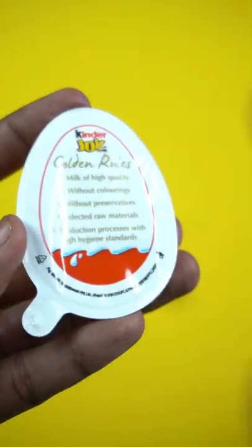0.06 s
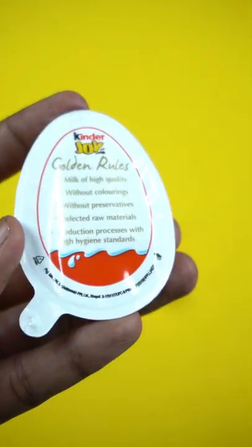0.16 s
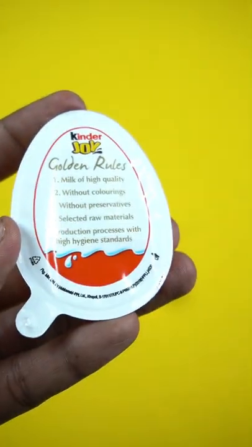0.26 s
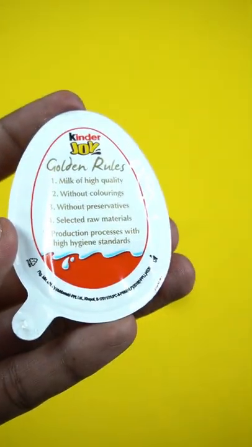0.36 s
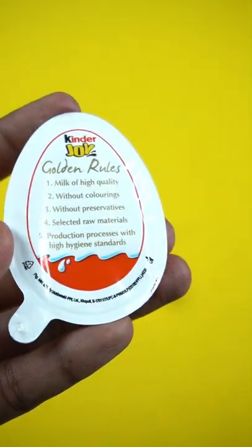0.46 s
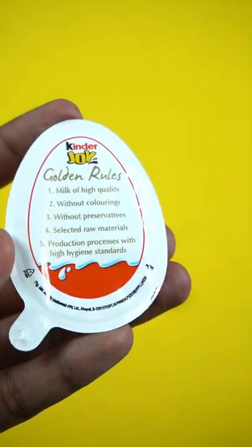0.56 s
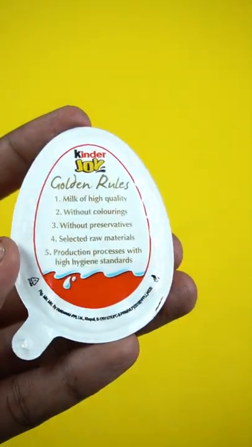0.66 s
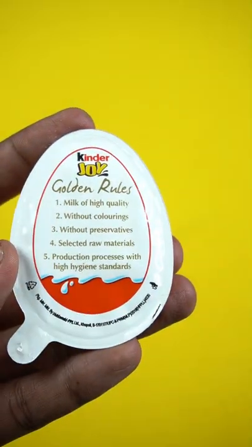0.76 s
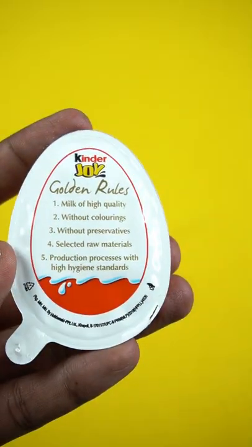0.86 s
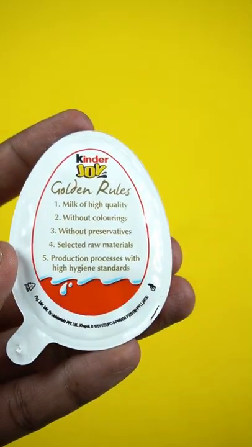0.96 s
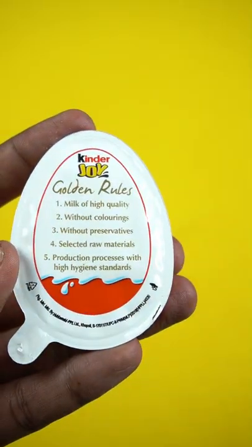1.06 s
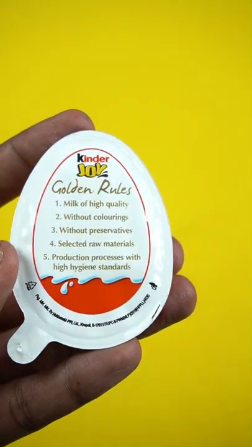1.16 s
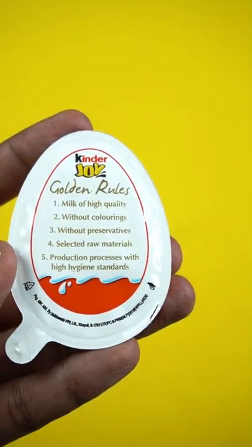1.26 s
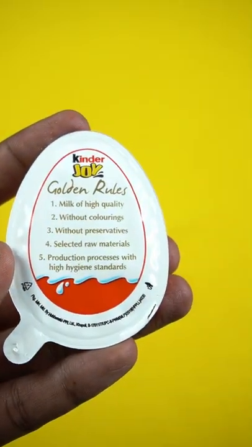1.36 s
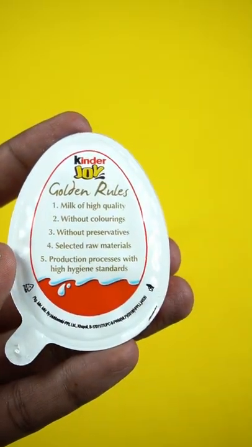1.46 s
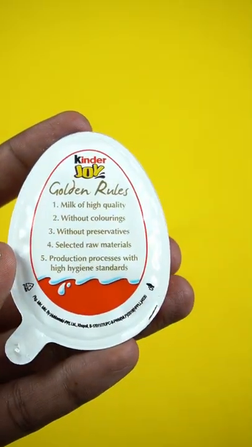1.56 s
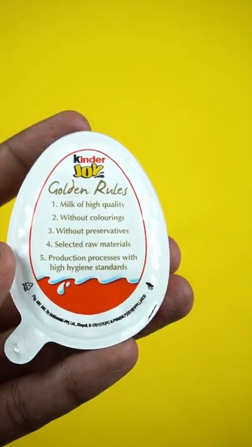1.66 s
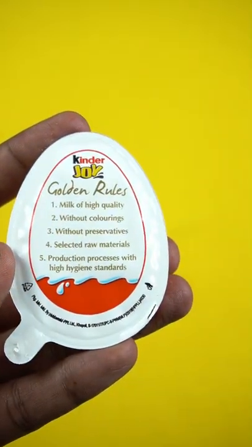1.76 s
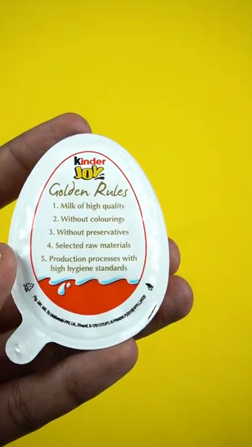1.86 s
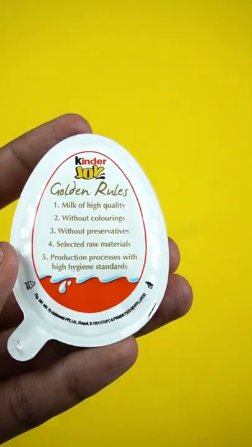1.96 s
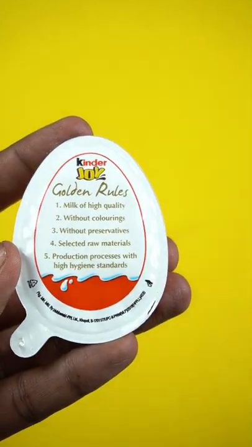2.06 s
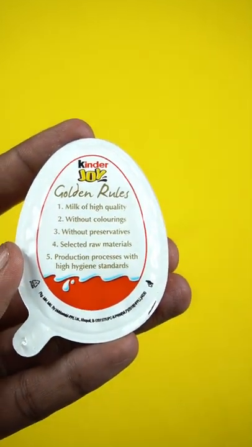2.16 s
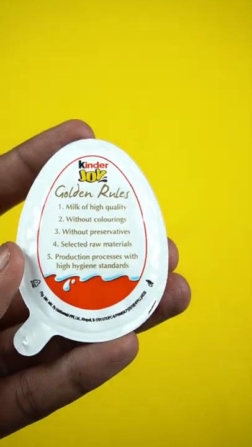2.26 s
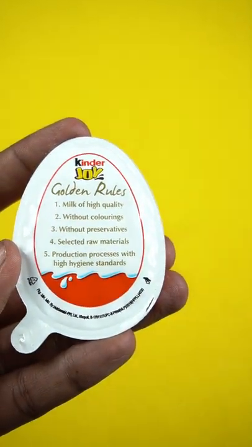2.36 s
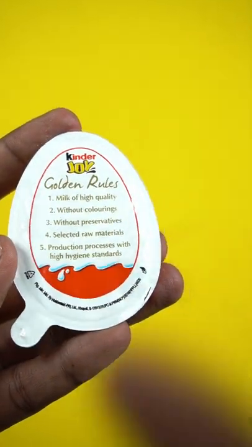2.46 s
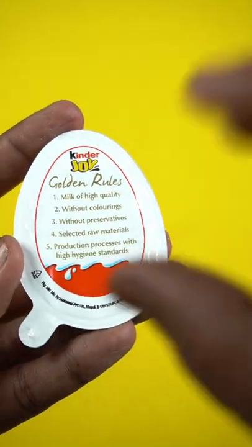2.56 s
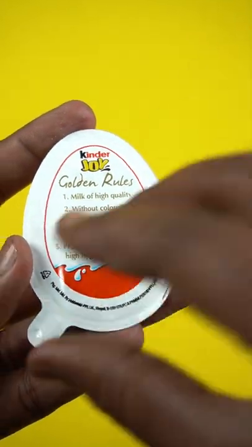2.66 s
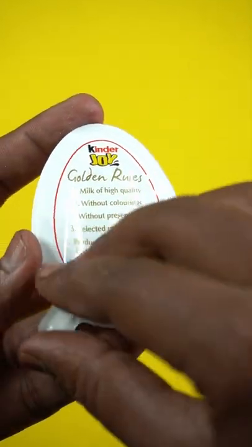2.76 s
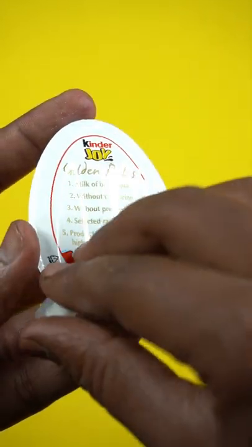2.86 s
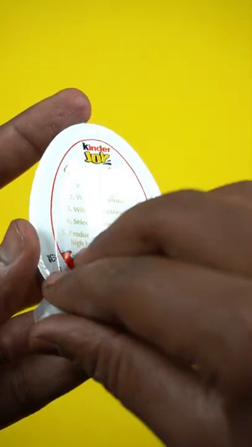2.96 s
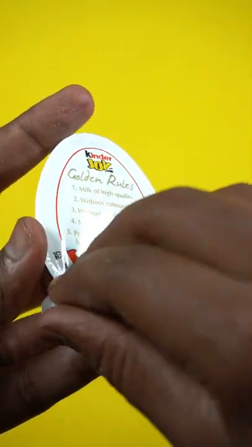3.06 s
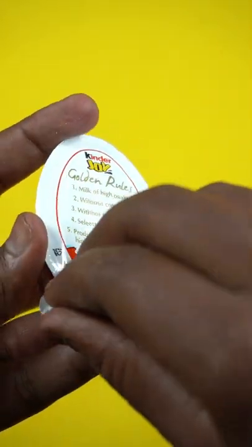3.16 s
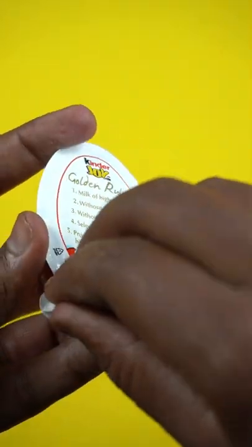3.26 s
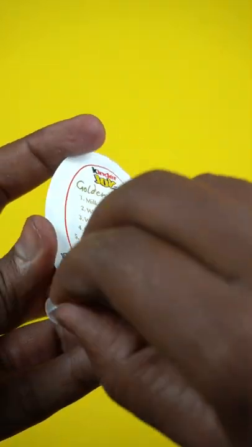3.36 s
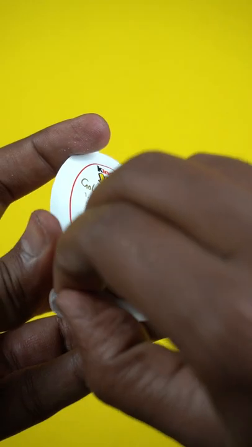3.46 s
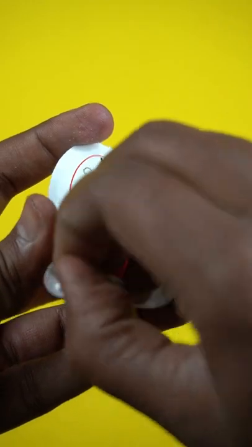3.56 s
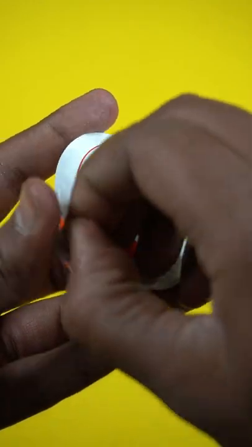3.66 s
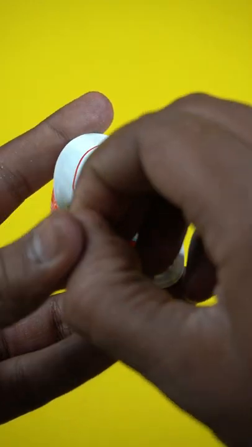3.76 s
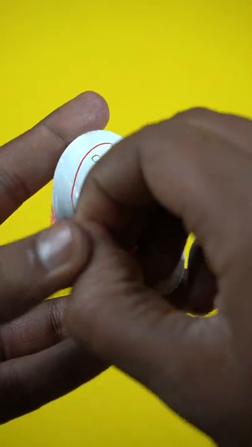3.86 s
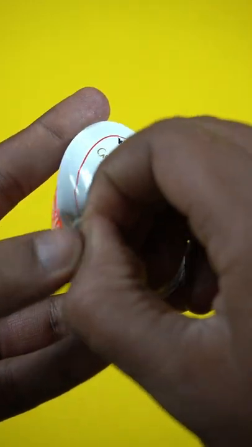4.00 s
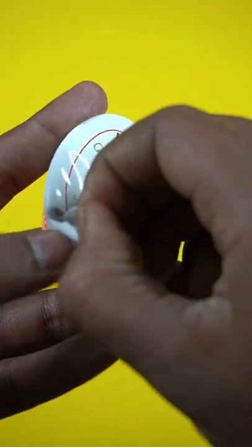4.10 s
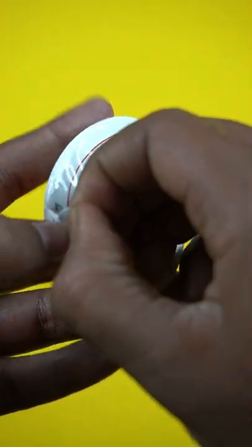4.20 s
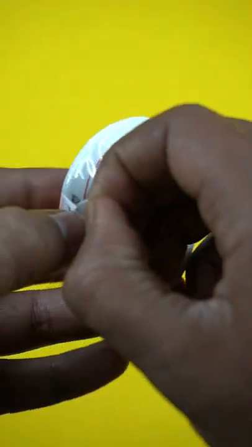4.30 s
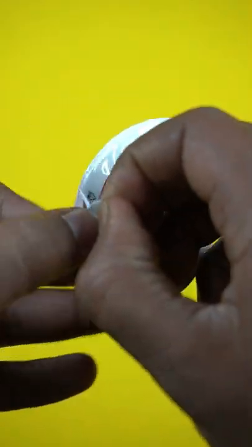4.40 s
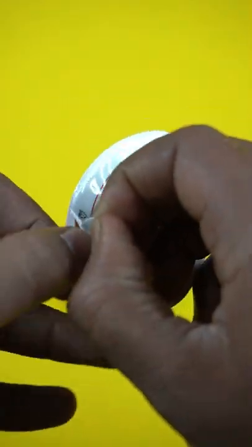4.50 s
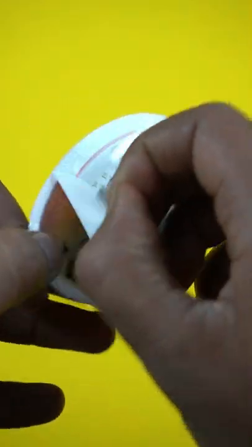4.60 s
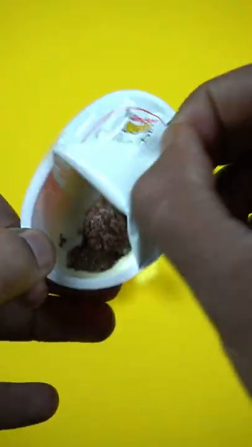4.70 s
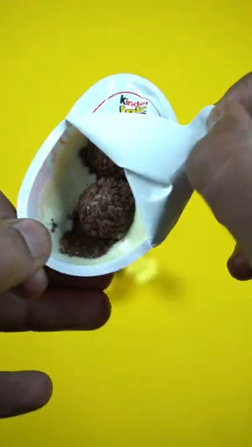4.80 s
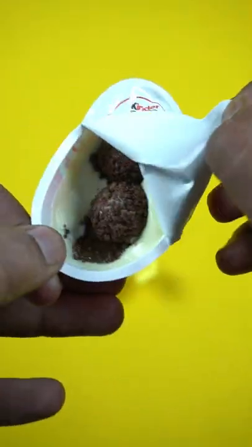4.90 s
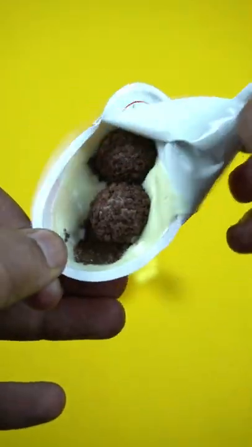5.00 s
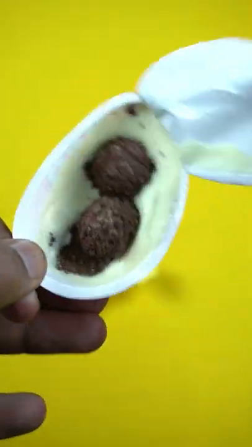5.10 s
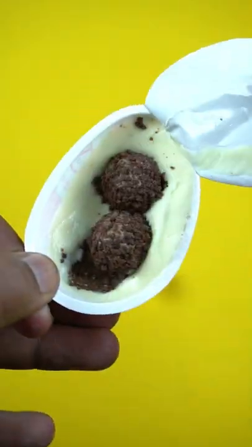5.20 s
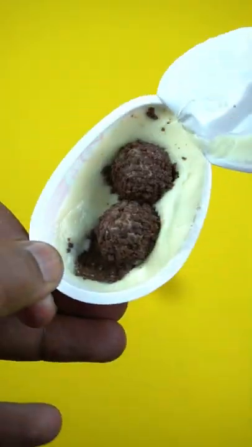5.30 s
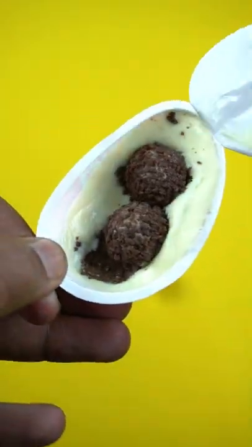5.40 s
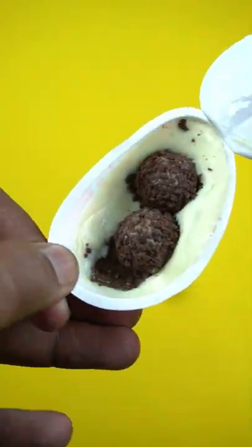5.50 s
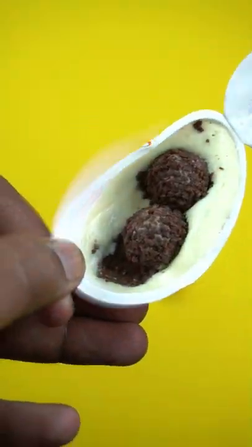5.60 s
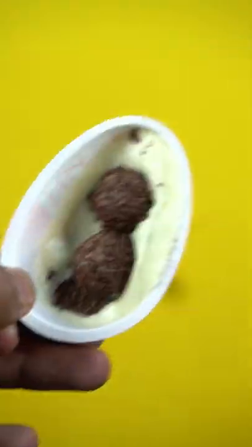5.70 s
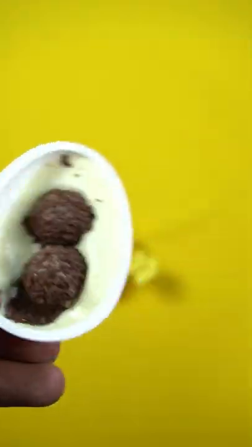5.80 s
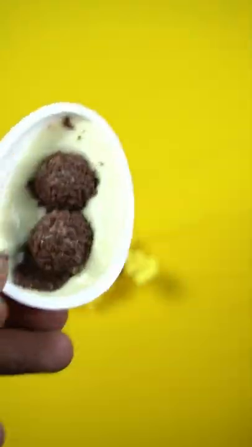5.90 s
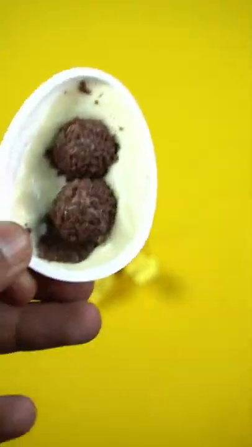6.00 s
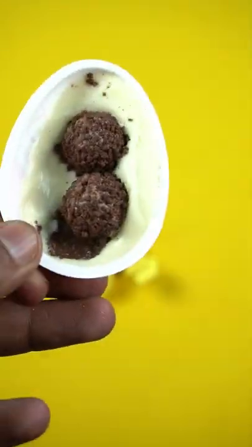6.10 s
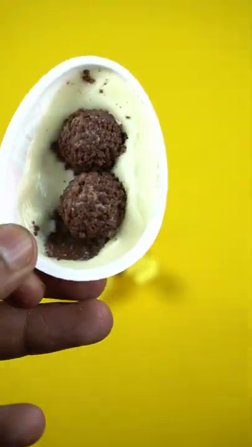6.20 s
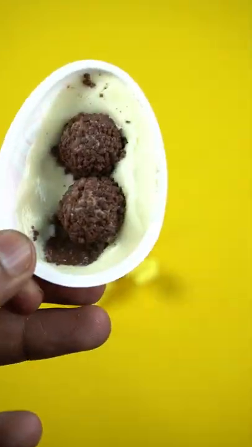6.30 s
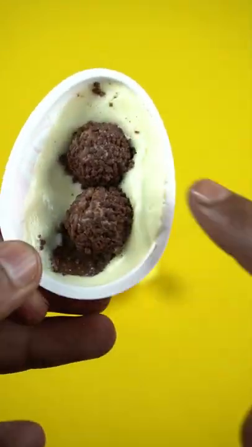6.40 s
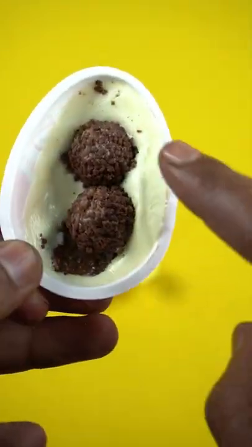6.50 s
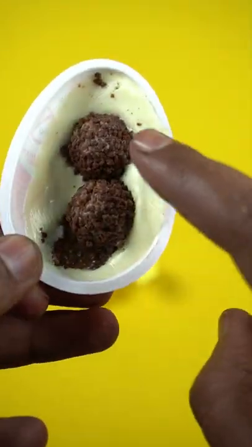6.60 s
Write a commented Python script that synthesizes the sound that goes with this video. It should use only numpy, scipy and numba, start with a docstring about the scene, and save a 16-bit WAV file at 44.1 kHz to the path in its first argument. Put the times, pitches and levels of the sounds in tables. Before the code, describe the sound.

Fingers rub a small plastic cup, foil ticks and squeaks, then the lid peels off in a dense sharp crackle with hollow plastic knocks.

```python
"""Peeling a foil lid off a plastic cup

Hands turn a small plastic cup, pick at the tab of its foil lid and peel the lid off, over quiet room tone.
Foil snaps are short pings and noise bursts; drag and peel are random slips through moving resonances.
The cup flexes with hollow knocks: short swells of a few rough cycles, with a fainter decaying ring of the
cup. Rubs, scrapes and rips are coloured slips. A table top returns one early echo of the snaps, and a
small room a short noise tail of all handling."""
import sys
import numpy as np
from scipy import signal
from scipy.fft import rfft, irfft, next_fast_len
from scipy.io import wavfile
from numba import njit

SR = 44100
rng = np.random.default_rng(int(sys.argv[2]) if len(sys.argv) > 2 else 0)


def int16_out(signal):
    """Quantize to a 16-bit WAV file."""
    q = np.round(np.clip(np.atleast_2d(signal).T, -1, 1) * 32767)
    wavfile.write(sys.argv[1], SR, q.astype(np.int16))


N = 293259
TIME = np.arange(N) / SR


def undb(db):
    """Decibels to gain."""
    return 10 ** (np.asarray(db) / 20)


def unit(x):
    """Scale to an rms of one."""
    return x / np.sqrt(np.mean(x ** 2) + 1e-30)


def band(x, lo_hz, hi_hz, order=2):
    """Causal band-pass."""
    sos = signal.butter(order, [lo_hz, min(hi_hz, .47 * SR)], "band", fs=SR, output="sos")
    return signal.sosfilt(sos, x)


def add(out, at_s, x):
    """Mix a sound into both channels from a given time on."""
    start = max(int(at_s * SR), 0)
    x = x[..., :N - start]
    out[:, start:start + x.shape[-1]] += x


def spread(mid, side, width):
    """Left and right from a shared and an opposed part."""
    return (mid + width * side * np.array([[1], [-1]])) / np.sqrt(1 + width ** 2)


def colour(x, hz, db):
    """Shape a sound by a spectrum given as points, joined along log frequency."""
    log_hz = np.log(np.maximum(np.fft.rfftfreq(x.shape[-1], 1 / SR), 1))
    return irfft(rfft(x) * undb(np.interp(log_hz, np.log(hz), db)), x.shape[-1])


def grit(shape, scatter_db, per_s):
    """Tiny slips at random moments, of random sign and size."""
    slips = rng.random(shape) < per_s / SR
    size = undb(scatter_db * np.minimum(rng.exponential(size=shape), 4))
    return slips * rng.standard_normal(shape) * size


def strokes(rows, spectrum, scatter_db, per_s, width):
    """Each stroke is a swell of fine slips, coloured by the surfaces that touch and tilted per octave."""
    out = np.zeros((2, N))
    hz, shape_db = np.transpose(spectrum)
    for middle_s, half_s, db, tilt_db in rows:
        n = 2 * next_fast_len(int(half_s * SR))
        mid, side = colour(grit((2, n), scatter_db, per_s), hz, shape_db + tilt_db * np.log2(hz))
        swell = np.hanning(n) ** 0.7
        add(out, middle_s - n / SR / 2, undb(db) * spread(unit(mid), unit(side), width) * swell)
    return out


# Room tone spectrum. Each row: frequency in Hz, relative level in dB per Hz.
AIR_SPECTRUM = [(15, -25), (25, -3.5), (140, -7.5), (253, -10.5), (322, -9), (368, -10), (410, -9.5),
                (895, -15.5), (1020, -16), (2230, -18.5), (2490, -20), (5430, -24.5), (15500, -30)]


def air():
    """Quiet room tone: a wavering rumble, mostly shared by both sides, under a smooth hiss."""
    level_db, waver_db = -55.5, 3.2
    log_hz = np.log(np.maximum(np.arange(N // 2 + 1) * SR / N, 1))
    hz, db = np.transpose(AIR_SPECTRUM)
    mid, side = rfft(rng.standard_normal((2, N))) * undb(np.interp(log_hz, np.log(hz), db))
    width = np.interp(log_hz, np.log([40, 400, 3000]), [.1, .3, 1.0])
    tone = unit(irfft(spread(mid, side, width), N))
    rumble = signal.sosfiltfilt(signal.butter(2, 600, fs=SR, output="sos"), tone)
    waver = np.interp(TIME, np.linspace(0, TIME[-1], 40), rng.standard_normal(40))
    return undb(level_db) * (tone + rumble * (undb(waver_db * waver) - 1))


# Room tail. Each row: frequency in Hz, level in dB, 60 dB decay time in seconds.
ROOM_TAIL = [(200, -10.5, 0.21), (695, -8.5, 0.35), (1840, -5.5, 0.37), (3890, -6, 0.36),
             (8200, -9.5, 0.37), (15000, -7, 0.22)]


def room(x):
    """Walls close by return a dense, short tail: noise bands that decay at their own rates."""
    gap_s, build_s, width = 0.0035, 0.002, 0.55
    t = np.arange(SR // 2) / SR
    hz, db, t60_s = np.transpose(ROOM_TAIL)
    edges_hz = np.geomspace(120, 18000, 9)
    build = 1 - np.exp(-np.maximum(t - gap_s, 0) / build_s)
    response = 0
    for lo, hi in zip(edges_hz, edges_hz[1:]):
        level_db, decay_s = (np.interp(np.log(lo * hi) / 2, np.log(hz), c) for c in (db, t60_s))
        noise = band(rng.standard_normal((2, len(t))), lo, hi, order=3)
        tail = unit(noise * undb(-60 * t / decay_s) * build)
        tail = tail * np.sqrt(2 * (hi - lo) / SR / len(t))  # energy in proportion to bandwidth
        response = response + undb(level_db) * spread(*tail, width * min(hi / 1500, 1))
    return signal.fftconvolve(x, response, axes=1)[:, :N]


def table_echo(x):
    """The table top under the hands returns one early reflection."""
    out = np.zeros((2, N))
    add(out, 0.011, undb(-21) * x)
    return out


# Finger shifts on the cup. Each row: middle in seconds, half span in seconds, rms level at the top
# of the swell in dB, tilt in dB per octave.
FINGER_RUBS = [(.61, 0.096, -53, -8.5), (1.17, 0.27, -60, 2.5), (1.47, 0.047, -51, 2.5),
               (1.56, .12, -50, 1.5), (1.72, .2, -56.5, -3.5), (1.92, 0.059, -48, -2), (2.16, .22, -43, 1),
               (2.61, 0.074, -57, -6)]
# Skin on plastic. Each row: frequency in Hz, relative level in dB per Hz.
SKIN_SPECTRUM = [(25, -8), (70, 5.5), (200, -2), (350, 2), (650, -5.5), (1100, -17), (1800, -14.5),
                 (3500, -24.5), (9000, -46), (16000, -60)]


def finger_rubs():
    """Soft skin slips over the plastic and sounds low."""
    return strokes(FINGER_RUBS, SKIN_SPECTRUM, scatter_db=1.4, per_s=7000, width=0.23)


# Scrapes at tab and rim. Each row: middle in seconds, half span in seconds, rms level at the top
# of the swell in dB, tilt in dB per octave.
NAIL_SCRAPES = [(.28, .2, -61, 6), (2.645, 0.039, -51, -5.5), (2.96, 0.051, -54, 1.5),
                (3.054, 0.044, -53.5, 1.5), (3.18, 0.16, -59, 3.5), (3.449, 0.072, -58, -2.5),
                (3.795, 0.042, -47.5, 7), (4.245, 0.015, -32, 2.5), (4.5, 0.18, -55, 10),
                (5.58, 0.072, -56, 1), (6.069, 0.039, -44.5, 6)]
# Nail on tab and rim. Each row: frequency in Hz, relative level in dB per Hz.
NAIL_SPECTRUM = [(300, -28), (1000, -19), (1900, -3.5), (2800, -5), (3950, -0.5), (5300, -9), (8000, -15),
                 (16000, -25)]


def nail_scrapes():
    """A hard nail slips in widely scattered steps and sounds high."""
    return strokes(NAIL_SCRAPES, NAIL_SPECTRUM, scatter_db=4.5, per_s=10000, width=0.48)


# Slides over the foil. Each row: middle in seconds, half span in seconds, rms level at the top
# of the swell in dB, tilt in dB per octave.
FOIL_SWISHES = [(.599, 0.039, -48.5, -0.5), (.842, .035, -51, -1), (.939, 0.044, -50.5, 0.5),
                (3.74, .09, -55.5, 2)]
# Dry skin on smooth foil. Each row: frequency in Hz, relative level in dB per Hz.
SMOOTH_SPECTRUM = [(500, 2), (2000, -5), (6000, -11.5), (9000, -4.5), (11500, 1.5), (16000, -18)]


def foil_swishes():
    """Dry skin slides on smooth foil in fine, wide slips."""
    return strokes(FOIL_SWISHES, SMOOTH_SPECTRUM, scatter_db=-1.8, per_s=6000, width=0.8)


# Rips of the seal. Each row: middle in seconds, half span in seconds, rms level at the top
# of the swell in dB, tilt in dB per octave.
SEAL_RIPS = [(5.07, 0.035, -32.5, 5), (5.116, .033, -28, -2.5), (5.41, .03, -42.5, 2.5),
             (6.07, 0.052, -48.5, -0.5)]
# Seal and bare rim. Each row: frequency in Hz, relative level in dB per Hz.
SEAL_SPECTRUM = [(100, -19), (190, -10.5), (300, -0.5), (600, 3.5), (850, -5.5), (1300, -1.5), (2700, -9),
                 (5000, -16.5), (16000, -38)]


def seal_rips():
    """The last of the seal rips and the bare rim crunches, in sparse, coarse slips."""
    return strokes(SEAL_RIPS, SEAL_SPECTRUM, scatter_db=1.5, per_s=2400, width=0.3)


# Flexes of the cup wall. Each row: peak in seconds, level in dB, pitch in Hz, push time scale in ms.
WALL_FLEXES = [(4.606, -32.5, 344, 5.1), (4.649, -40, 434, 8.6), (4.721, -40, 505, 8.1),
               (4.785, -48, 423, 25), (5.046, -38.5, 400, 6.6), (5.096, -34, 423, 2.12),
               (5.113, -31, 465, 8), (5.136, -28.5, 363.5, 6.1), (5.406, -25.5, 443, 3.1),
               (5.642, -28.5, 539, 1.76)]
# Air and walls of the cup. Each row: frequency in Hz, level in dB, 60 dB decay time in seconds.
CUP_MODES = [(412.7, 1.5, 0.21), (483, 2, 0.073), (329, -3, 0.45)]


def flexes():
    """The cup wall swells in and out for a few rough cycles, and the hollow rings on more faintly."""
    rough, ring_db, lead_s = 0.45, -11, .04
    out, t = np.zeros((2, N)), np.arange(int(.2 * SR)) / SR
    hollow = sum(undb(db) * np.sin(2 * np.pi * hz * t) * undb(-60 * t / t60_s) for hz, db, t60_s in CUP_MODES)
    for peak_s, db, hz, push_ms in WALL_FLEXES:
        noise = unit(band(rng.standard_normal(len(t)), hz * 0.697, hz * 1.23, order=3))
        wall = np.sqrt(2) * np.cos(2 * np.pi * hz * (t - lead_s)) + rough * noise
        push = wall * np.exp(-np.abs(1000 * (t - lead_s) / push_ms) ** 1.74 / 2)
        ring = unit(signal.fftconvolve(push, hollow)[:len(t)]) * push.std()
        add(out, peak_s - lead_s, undb(db) * (push + undb(ring_db) * ring))
    return out


@njit
def resonate(x, hz, q):
    """State-variable band-pass whose centre moves."""
    y, b, l = np.empty(len(x)), 0., 0.
    for i in range(len(x)):
        g = np.tan(np.pi * hz[i] / SR)
        v = (b + g * (x[i] + 1e-18 - l)) / (1 + g * (g + 1 / q))
        b, l, y[i] = 2 * v - b, l + 2 * g * v, v / q
    return y


def membrane(force, pitch_hz, q, scatter_db, per_s, clump_db, second, lower_db, rasp_db, rasp_lo_hz, rasp_hi_hz):
    """Stick and slip drive two resonances of the lid, which move with its tension."""
    moving = force > 0
    t, hz = TIME[moving], pitch_hz[moving]
    # the grip catches and lets go every few milliseconds
    grip = undb(clump_db * np.interp(t - t[0], np.arange(200) / 200, rng.uniform(-1, 1, 200)))

    def mode(slips, f):
        """Two passes through one resonance."""
        return unit(resonate(resonate(slips, f, float(q)), f, float(q)))

    voices = []
    for slips in grip * grit((2, len(t)), scatter_db, per_s):
        rasp = unit(band(slips, rasp_lo_hz, rasp_hi_hz))
        voices.append(unit(mode(slips, hz) + undb(lower_db) * mode(slips, hz * second) + undb(rasp_db) * rasp))
    out = np.zeros((2, N))
    add(out, t[0], force[moving] * spread(*voices, 0.32))
    return out


def effort(start_s, attack_s, ease_s, end_s, db, fade_db):
    """A pull builds up, holds and fades, then stops."""
    build = np.clip((TIME - start_s) / attack_s, 0, 1) ** 1.2
    return build * undb(db + np.interp(TIME, [ease_s, end_s], [0, fade_db])) * (TIME < end_s)


def drag():
    """The taut lid squeaks under a fingertip; its resonance climbs as the finger presses."""
    start_s, slack_hz, taut_hz, tighten_s = 2.62, 1450, 1912, 0.058
    force = effort(start_s, attack_s=.14, ease_s=2.85, end_s=3.266, db=-40.5, fade_db=-25)
    hz = taut_hz + (slack_hz - taut_hz) * np.exp(-np.maximum(TIME - start_s, 0) / tighten_s)
    return membrane(force, hz, q=9, scatter_db=1.6, per_s=3000, clump_db=1.0, second=0.881,
                    lower_db=-6.5, rasp_db=-9, rasp_lo_hz=1400, rasp_hi_hz=1760)


# Resonance of the freed foil. Each row: time in seconds, frequency in Hz.
FREED_FOIL_PITCH = [(4.585, 2170), (4.68, 2360), (4.75, 2360), (4.775, 3020), (4.92, 2870)]


def peel():
    """The seal lets go in a dense crackle that rings the freed foil, then dies away."""
    force = effort(4.586, attack_s=0.0061, ease_s=4.833, end_s=4.93, db=-35, fade_db=-29)
    hz = np.interp(TIME, *np.transpose(FREED_FOIL_PITCH))
    return membrane(force, hz, q=4, scatter_db=1.8, per_s=900, clump_db=5, second=0.74,
                    lower_db=-23, rasp_db=-12.5, rasp_lo_hz=2700, rasp_hi_hz=6200)


# Foil and rim snaps. Each row: start in seconds, level in dB, ring in Hz, crack in dB re level,
# fizz in dB re level, time scale in ms.
FOIL_SNAPS = [(1.775, -53.5, 1560, -30, -24, 2.1), (1.8866, -41, 2080, -25, -35, 1.4),
              (1.8889, -40, 1080, -26, -32, 1.8), (1.8992, -47.5, 1720, -6, -32, 0.88),
              (2.129, -43, 1770, -10, -25, 1.1), (2.3557, -46.5, 920, -12, -6, 3.7),
              (2.6166, -28.5, 1520, -7.5, -23, 1.63), (2.8265, -33, 1360, -24, -20, 2.5),
              (2.8318, -31.5, 1950, -11, -29, 1.9), (3.486, -25, 1780, -1.5, -14, 1.36),
              (3.6065, -27, 1644, 0.5, -1.5, 2.4), (3.6455, -28, 1670, 3, -2.5, 1.66),
              (3.6512, -30, 2100, -5, -6, 1), (3.8266, -33.5, 1714, -35, -39, 2.25),
              (4.0084, -37.5, 1550, -22, -18, 1.8), (4.022, -27.5, 1614, -6, 3, 1.9),
              (4.0412, -52, 1580, 2, 22, 2.4), (4.072, -44.5, 1480, 12.5, 14, 2.7),
              (4.085, -35, 1650, 6, 9, 1.15), (4.0906, -26, 1650, 3, 5, 1.24),
              (4.403, -32, 1940, -6, -37, 0.94), (4.5923, -24, 2080, -9, -8, 2),
              (4.599, -20.5, 1950, -6, -5.5, 0.96), (4.6072, -25, 2030, -5, -7, 1.5),
              (4.6098, -30.5, 2050, 8, -3, 2.3), (4.614, -20, 2280, -6.5, -24, 2.2),
              (4.6407, -41, 2260, -8, -18, 1.7), (4.6595, -27, 2500, 5.5, -12, 2),
              (4.6629, -18.5, 2240, -6.5, -10, 3.2), (4.7195, -29.5, 2140, -6, -14, 1.5),
              (4.739, -19.5, 2270, -28, -23, 0.76), (4.754, -27.5, 2120, -19, -28.5, 2.8),
              (4.764, -20, 2440, -1, -12, 1.6), (4.809, -30, 2110, -6, -14, 3.3),
              (4.8222, -34, 1220, -4, -10, 2.8), (4.9497, -41.5, 1630, 1.5, 6, 1.2),
              (4.988, -26, 2470, -8.5, -21, 0.88), (4.9892, -29, 1350, -12, -28, 2),
              (5.0642, -22, 2610, 0.5, -7, 0.95), (5.0679, -20.5, 3370, -12, -10.5, 0.97),
              (5.1281, -26.5, 1940, -5.5, -6, 6.3), (5.132, -32, 1020, 9, 4, 1.6),
              (5.1361, -28.5, 2470, -1, 7.5, 1.2), (5.423, -52.5, 1736, 6, 2, 1.8),
              (5.6409, -28.5, 1610, -7, -15, 1.1), (5.6439, -28.5, 1270, -24, -30, 1.8),
              (5.6605, -28.5, 2720, 9.5, 5.5, 1.2), (6.034, -45, 3350, -5, -8, 0.64),
              (6.059, -48.5, 1580, -3, 6.5, 1.3), (6.087, -52, 3040, 11.5, 6, 0.78)]


def snap_rows():
    """Every snap, and the faint one that follows as a neighbouring facet settles."""
    settle_db, hz_scatter = -22.5, 0.36
    at_s, db, hz, crack_db, fizz_db, ms = np.transpose(FOIL_SNAPS)
    wait_s = rng.uniform(.006, .03, len(at_s))
    detune = 1 + hz_scatter * rng.uniform(-1, 1, len(at_s))
    settling = [at_s + wait_s, db + settle_db, hz * detune, crack_db, fizz_db, ms]
    return np.hstack([np.transpose(FOIL_SNAPS), settling])


def snaps(rows, rough):
    """A facet of foil flips: the facet rings, its creases ping higher and shorter, and the rim thuds."""
    crack_hz, fizz_hz = 3985, 8330  # creases and foil edge, shared by all snaps
    ring_left_db, crack_left_db, pan_scatter_db = -1, 0.9, 1.7  # left minus right
    spiky, width, hiss = 2.42, 0.79, 1.66
    flutter_db, flutter_ms, onset_s = -24, 5, 0.00014
    t = np.arange(int(.03 * SR)) / SR
    at_s, db, hz, crack_db, fizz_db, ms = rows[:, :, None]
    age = 1000 * t / ms
    # louder snaps thud more, and the open cup adds up to 7 dB as the lid comes off
    thud_db = -45.5 + 0.42 * (db + 24) + np.interp(at_s, [4.65, 5.2], [0, 7])

    def scaled(x):
        """Unit rms over 5 ms for every snap."""
        return x / np.sqrt(np.sum(x ** 2, axis=-1, keepdims=True) / (.005 * SR))

    def ping(f, life):
        """A few cycles that swell and die."""
        return scaled(np.sin(2 * np.pi * (f * t + rng.random(at_s.shape))) * age * np.exp(-age / life))

    def burst(lo_hz, hi_hz, life, side_share):
        """Spiky noise crowds into the first milliseconds; a faint flutter follows."""
        noise = rng.standard_normal((2, len(at_s), len(t)))
        cracks = np.sign(noise) * np.abs(noise) ** spiky
        fade = np.exp(-age / life) + undb(flutter_db) * np.exp(-1000 * t / flutter_ms)
        fade = fade * (1 - np.exp(-t / onset_s))
        mid, side = scaled(band(cracks * fade, lo_hz, hi_hz, order=3))
        return np.array([mid + side_share * side, mid - side_share * side])

    facet = scaled(ping(hz, 0.43) + rough * burst(1090, 2700, 1.24, width / 2))
    crease = scaled(ping(crack_hz, 0.14) + 2 * rough * burst(2600, 6460, 1.0, width))
    edge = scaled(ping(fizz_hz, 0.056) + 2 * hiss * rough * burst(5800, 14300, 0.87, 0.71 * width))
    thud = burst(250, 900, 2.2, 0)

    pan_db = pan_scatter_db * rng.standard_normal(at_s.shape)
    ring_gain, crack_gain = (undb(db + np.array([pan_db + left_db, -pan_db - left_db]) / 2)
                             for left_db in (ring_left_db, crack_left_db))
    sounds = ring_gain * facet + undb(thud_db) * thud
    sounds = sounds + crack_gain * (undb(crack_db) * crease + undb(fizz_db) * edge)
    out = np.zeros((2, N))
    for k, start_s in enumerate(at_s[:, 0]):
        add(out, start_s, sounds[:, k])
    return out


def scene():
    """All the handling sounds, their room and the room tone."""
    rubs = finger_rubs() + nail_scrapes() + foil_swishes() + seal_rips()
    handling = rubs + flexes() + drag() + peel()
    rows = snap_rows()
    crackle = snaps(rows, rough=0.45)
    # crumpled foil radiates a different, rougher spectrum toward each wall, so the tails blend smoothly
    walls = 2
    echoes = sum(room(snaps(rows, rough=0.73)) for _ in range(walls)) / np.sqrt(walls)
    return air() + undb(-3) * room(handling) + echoes + handling + table_echo(crackle) + crackle


def record(dry):
    """The recorder cuts the top above 16.3 kHz with a steep low-pass."""
    return signal.sosfilt(signal.ellip(10, .2, 70, 16300, fs=SR, output="sos"), dry)


dry = scene()
out = record(dry)
int16_out(out)
```